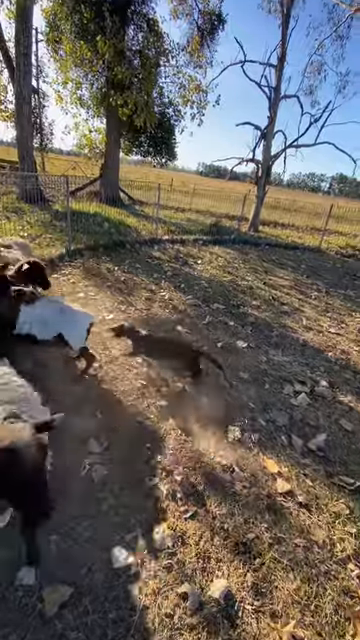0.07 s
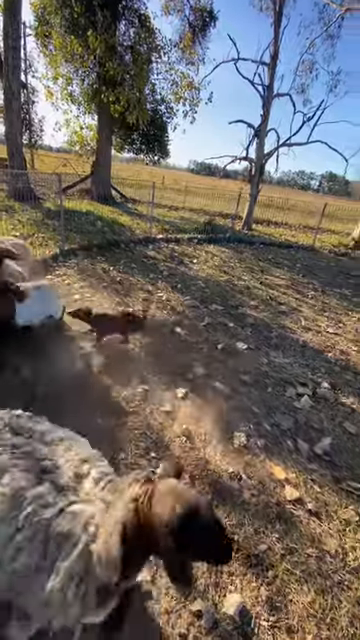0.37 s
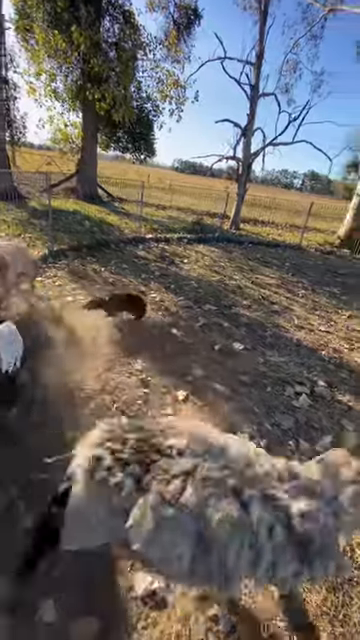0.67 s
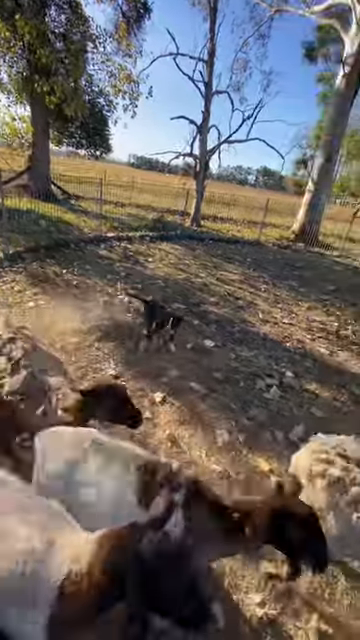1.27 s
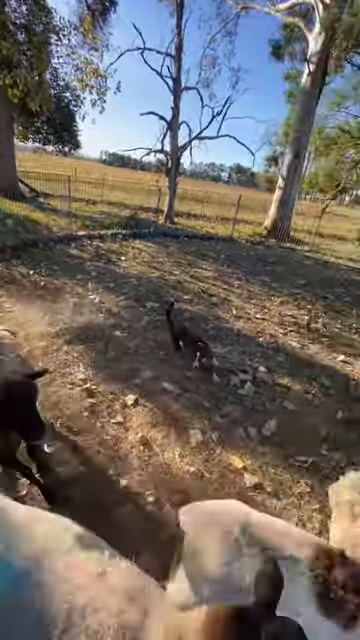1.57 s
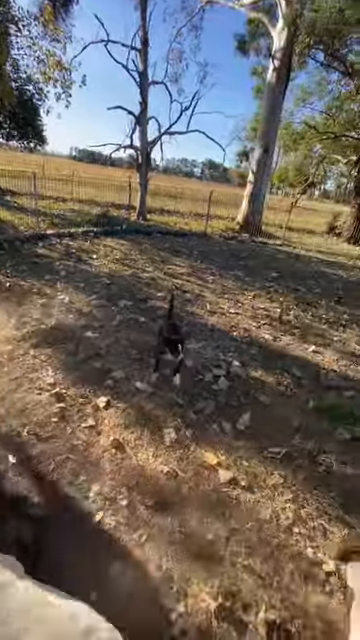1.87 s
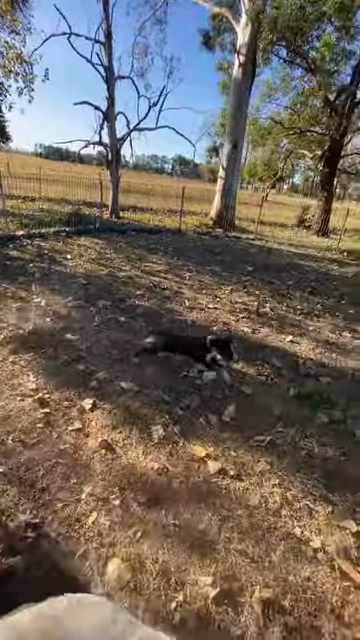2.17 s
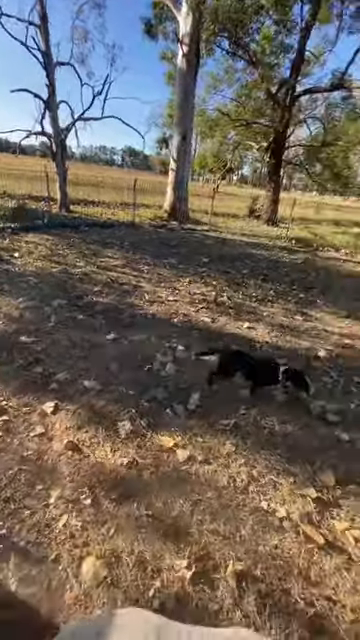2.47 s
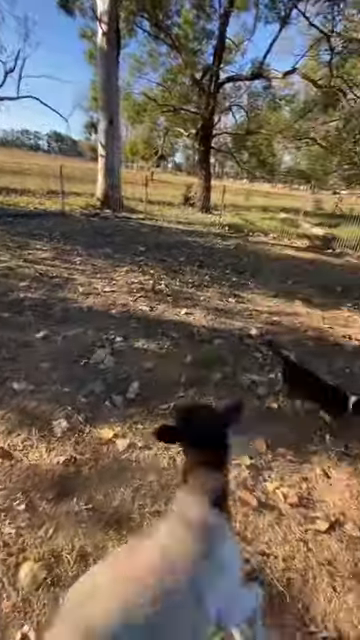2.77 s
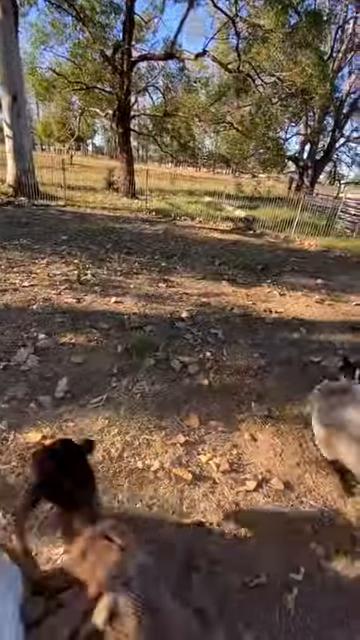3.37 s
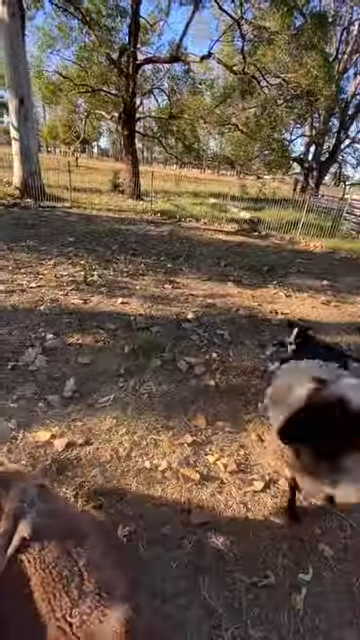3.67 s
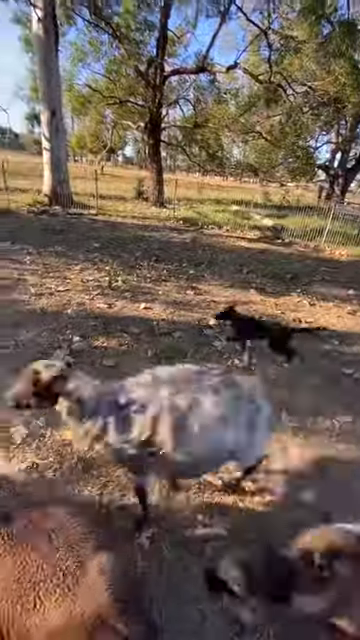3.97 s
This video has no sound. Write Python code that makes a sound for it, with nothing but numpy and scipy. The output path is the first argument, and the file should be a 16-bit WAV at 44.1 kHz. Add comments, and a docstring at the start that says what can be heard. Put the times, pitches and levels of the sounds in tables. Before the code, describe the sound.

Running sheep thud and scuff through dry leaf litter, snapping twigs and kicking stones.

```python
"""Feet scuff through dead leaves and a twig snaps: sheep run close past, chased by a dog, over dry
stony ground. Hooves thud on the hard earth, crunch grit, splinter twigs and kick stones that ring
briefly. Behind them the rest of the flock patters and rustles, and the ground trembles under it.
Heard in stereo in the open air, with the microphone a short way from the animals."""
import sys
import numpy as np
from scipy import signal
from scipy.fft import rfft, irfft, next_fast_len
from scipy.io import wavfile

SR = 44100
rng = np.random.default_rng(int(sys.argv[2]) if len(sys.argv) > 2 else 0)


def persist_wave(psi):
    """Save psi, clipped to +-1, as 16-bit WAV."""
    counts = np.round(np.clip(psi, -1, 1) * 32767).astype(np.int16)
    wavfile.write(sys.argv[1], SR, np.atleast_2d(counts).T)


N = 176400
TIME = np.arange(N) / SR
HIT_TIME, SCUFF_TIME = TIME[:SR // 6], TIME[:SR // 4]

# Feet dragging through the litter close by. Each row: start in seconds, length in seconds,
# crunch of grit in dB, hiss of leaves in dB, pitch of the rasp in Hz, level of the rasp in dB.
SCUFFS = [(0, 0.046, -40.5, -44, 4840, -48), (0.113, 0.13, -49, -47.5, 970, -58),
          (0.247, 0.042, -40, -39.5, 1090, -44.5), (0.294, 0.03, -37.5, -34.5, 3260, -42),
          (0.41, 0.045, -34, -32.5, 1120, -53), (0.456, 0.074, -32, -36.5, 1860, -61),
          (0.528, 0.15, -43.5, -42.5, 4220, -58), (0.631, 0.087, -41, -41.5, 3350, -45.5),
          (0.787, 0.055, -36.5, -37, 1036, -44), (0.862, 0.078, -36.5, -37, 1370, -46),
          (0.942, 0.078, -38, -38, 960, -55), (1.056, 0.051, -43.5, -48, 1070, -48),
          (1.122, 0.033, -57, -55, 1190, -54), (1.242, 0.07, -42.5, -40.5, 2810, -50),
          (1.345, 0.049, -40, -37.5, 1430, -51), (1.386, 0.049, -43.5, -41, 1970, -63),
          (1.47, 0.063, -41.5, -45, 1330, -58), (1.622, 0.097, -40.5, -40.5, 6180, -43),
          (1.707, 0.063, -45, -42.5, 5870, -55), (1.81, 0.063, -54, -42, 2000, -55),
          (1.857, 0.098, -40.5, -41.5, 2170, -44.5), (1.974, 0.08, -39.5, -42, 2000, -47.5),
          (2.118, 0.031, -48, -50, 995, -56.5), (2.206, 0.052, -41, -39, 4460, -49),
          (2.277, 0.054, -39, -46.5, 1030, -55), (2.442, 0.029, -39.5, -38, 3700, -49),
          (2.532, 0.11, -45.5, -46.5, 2690, -48.5), (2.574, 0.053, -42, -42, 1610, -69),
          (2.658, 0.044, -39.5, -40.5, 2000, -49), (2.703, 0.096, -39, -40, 1370, -52),
          (2.866, 0.059, -43.5, -49, 1350, -54.5), (2.925, 0.038, -33.5, -35, 1600, -57),
          (3.059, 0.13, -40.5, -42, 4940, -52), (3.267, 0.043, -50, -46, 1980, -67),
          (3.323, 0.049, -40, -44, 3070, -47), (3.424, 0.12, -44.5, -38, 2000, -54.5),
          (3.561, 0.062, -57, -43, 986, -47.5), (3.645, 0.017, -35.5, -32.5, 2350, -43),
          (3.735, 0.045, -37.5, -36, 2430, -40.5), (3.775, 0.046, -32, -29, 1670, -62),
          (3.83, 0.076, -41.5, -40.5, 955, -53), (3.96, 0.05, -31.5, -29, 1550, -43)]
# The stereo image's lean to one side. Each row: frequency in Hz, left over right in dB.
STEREO_BALANCE = [(60, 0.5), (200, 0.5), (400, 2.5), (700, 3.5), (1200, 7), (2400, 2), (4400, 1.3),
                  (8000, -0.5), (15000, 0.5)]


def from_db(db):
    """Decibels to gain."""
    return 10 ** (np.asarray(db) / 20)


def unit_rms(x):
    """Scale to an rms of 1."""
    return x / np.sqrt(np.mean(x ** 2) + 1e-20)


def at_hz(points, hz):
    """Read a spectrum on a log-frequency axis."""
    freqs, values = np.transpose(points)
    return np.interp(np.log(np.maximum(hz, 1)), np.log(freqs), values)


def fade(t, t60):
    """Hold at 1 until t = 0, then fall 60 dB every t60 seconds."""
    return 1000.0 ** (-np.maximum(t, 0) / t60)


def band(x, low_hz, high_hz, order=2):
    """Butterworth band-pass."""
    top = min(high_hz, .47 * SR)
    sos = signal.butter(order, [min(low_hz, top / 1.05), top], "band", fs=SR, output="sos")
    return signal.sosfilt(sos, x + 1e-18)


def drift(rate_hz):
    """A smooth random wander with a spread of 1."""
    hop, settle = 40, 2000
    pole = np.exp(-2 * np.pi * hop * rate_hz / SR)
    noise = rng.standard_normal(N // hop + settle + 2)
    slow = signal.lfilter([1], [1, -2 * pole, pole * pole], noise)[settle:]
    return np.interp(np.arange(N) / hop, np.arange(len(slow)), unit_rms(slow))


def stereo_noise(size):
    """White noise, half its power shared by both sides, half scattered."""
    return (rng.standard_normal(size) + rng.standard_normal((2, size))) / np.sqrt(2)


def add(out, start, sound):
    """Mix a sound in at start seconds."""
    i = int(np.clip(start * SR, 0, N - 1))
    out[:, i:i + sound.shape[-1]] += sound[..., :N - i]


def scuff_shape(length, attack_s=0.015):
    """A scuff swells, holds while the foot drags and dies away."""
    return np.clip(SCUFF_TIME / attack_s, 0, 1) * fade(SCUFF_TIME - length, t60=0.1)


def scuff_levels(rustle_db):
    """How hard grit and leaves are stirred: near scuffs add their power to the flock's rustle."""
    power = np.ones((2, 1)) * from_db(rustle_db) ** 2
    for start, length, grit_db, leaf_db, _, _ in SCUFFS:
        add(power, start, (from_db([[grit_db], [leaf_db]]) * scuff_shape(length)) ** 2)
    return np.sqrt(power)


def crackle(colour, grains_per_s=1700, spread_db=2.5, flicker_db=3):
    """Dense tiny fractures of uneven size over a smooth hiss, flickering separately in 26 bands."""
    fractures = rng.random(N) < grains_per_s / SR
    sizes = unit_rms(fractures * from_db(spread_db * np.minimum(rng.exponential(1, N), 5)))
    grains = np.hypot(sizes, from_db(-3))   # the floor is the hiss
    edges = np.geomspace(300, 17000, 26 + 1)
    out = np.zeros((2, N))
    for low, high in zip(edges, edges[1:]):
        gain = from_db(at_hz(colour, np.sqrt(low * high)) + flicker_db * drift(rate_hz=28.3))
        out += gain * band(grains * stereo_noise(N), low, high)
    return unit_rms(out)


def litter(grit, leaves):
    """Grit crunches and dead leaves hiss as hard as the feet stir them."""
    # Colours of crushed grit and of dry leaves. Each row: frequency in Hz, relative density in dB.
    grit_colour = [(300, -15), (500, 2.5), (800, 2), (1300, -1), (2300, 4.5), (3300, -0.5), (4800, -6),
                   (8000, -0.5), (16000, -44)]
    leaf_colour = [(300, -9), (2000, -22), (3500, 0), (5000, 8.5), (6300, -1.5), (7600, -18.5), (10000, -2),
                   (12300, -2.5), (13000, -41), (16000, -39)]
    return from_db(0.5) * grit * crackle(grit_colour) + from_db(-1) * leaves * crackle(leaf_colour)


def rasps(relative_width=0.15):
    """A narrow band of crackle gives each scuff its own colour."""
    out = np.zeros((2, N))
    edge = 1 + relative_width / 2
    for start, length, _, _, hz, db in SCUFFS:
        spiky_noise = stereo_noise(len(SCUFF_TIME)) * rng.exponential(1, len(SCUFF_TIME)) ** 2
        rasp = unit_rms(band(spiky_noise, hz / edge, hz * edge))
        add(out, start, from_db(db + 2.5) * rasp * scuff_shape(length))
    return out


def rumble(flock_db):
    """The ground trembles under many feet, swelling with the flock."""
    # Colour of the trembling ground. Each row: frequency in Hz, relative density in dB.
    ground_colour = [(20, -40), (32, -18), (45, 9), (70, -6.5), (100, -8.5), (200, -4.5), (400, -8),
                     (800, -27.5)]
    gain = from_db(at_hz(ground_colour, np.fft.rfftfreq(N, 1 / SR)))
    return from_db(flock_db - 49) * unit_rms(irfft(rfft(stereo_noise(N)) * gain, N))


def snap(db, hz, crack_db, rise_s=0.0016, relative_width=0.36):
    """A twig splinters fibre by fibre: a burst around one pitch, a bright crack, a spray of debris."""
    noise = stereo_noise(len(HIT_TIME))
    edge = 1 + relative_width / 2
    body = unit_rms(band(noise, hz / edge, hz * edge, order=1))
    crack = unit_rms(band(noise, 5430, 12300)) * fade(HIT_TIME, t60=0.0054)
    burst = fade(HIT_TIME - rise_s, t60=0.017)
    debris = from_db(-18.5) * fade(HIT_TIME, t60=0.23)
    rise = np.clip(HIT_TIME / rise_s, 0, 1)
    return from_db(db - 9) * rise * (burst + debris) * body + from_db(db + crack_db - 7) * crack


def twigs(leaves, small_per_s=44):
    """Loud snaps close by, and small ones as strong as the stirring of the leaves."""
    # Dry twigs and leaves breaking. Each row: start in seconds, level in dB, pitch in Hz,
    # bright crack in dB relative to that level.
    near_snaps = [(.008, -24, 5300, 6), (0.039, -28, 5500, 5), (0.166, -35, 3520, -12),
                  (0.2993, -14.5, 5540, -9), (.314, -17.5, 3360, 0), (.373, -39, 7000, 5),
                  (0.414, -19.5, 2100, -2), (0.432, -25, 5000, 2), (0.442, -22, 4500, -6),
                  (0.593, -33, 3000, 12), (0.7957, -19.5, 3600, -3), (.8, -23.5, 5030, -5),
                  (.886, -28, 2220, 7), (.912, -20.5, 3860, -19), (.919, -23, 5600, -17),
                  (.99, -22, 5430, -5), (1.109, -38, 6000, 16), (1.334, -25, 5000, -8),
                  (1.367, -19.5, 5000, -5), (1.51, -32, 5200, 12.5), (1.639, -34, 5700, -17),
                  (1.8786, -20, 4800, -29), (1.982, -29, 2290, -6), (2.175, -29.5, 5960, -15),
                  (2.205, -28.5, 5490, -8), (2.224, -28, 5240, -12), (2.29, -16, 2200, -27),
                  (2.4, -35, 9600, 4), (2.4593, -25.5, 5700, 7), (2.673, -20, 5230, -6),
                  (2.689, -18.5, 5200, -3), (2.866, -42, 8000, 7), (2.918, -24, 5570, 5),
                  (2.944, -25, 5600, -3), (2.95, -22, 5600, -14), (3.253, -27, 3420, 4.5),
                  (3.34, -25, 6200, 10), (3.49, -23, 6000, 11), (3.5115, -22, 6300, -10),
                  (3.6579, -17, 2470, -17), (3.66, -17, 4700, -8), (3.809, -17.5, 3020, -5),
                  (3.819, -18, 4000, -11), (3.882, -22, 6420, -12), (3.932, -27, 7000, -3),
                  (3.971, -12, 6350, 5.5)]
    out = np.zeros((2, N))
    for start, db, hz, crack_db in near_snaps:
        add(out, start, snap(db, hz, crack_db))
    for start in rng.uniform(0, N / SR, int(small_per_s * N / SR)):
        hz = 4500 * 2 ** rng.uniform(-1.83, 1)
        add(out, start, np.interp(start, TIME, leaves) * snap(rng.normal(1, 2.8), hz, crack_db=-18))
    return out


def thump(hz, peak_cycles, sharpness=2.18):
    """A swing of the ground that builds up and dies within a few cycles."""
    cycles = hz * HIT_TIME
    age = cycles / peak_cycles
    return np.sin(2 * np.pi * cycles) * (age * np.exp(1 - age)) ** sharpness


def hoof(knock_db, hz, peak_cycles, earth_db, earth_hz=500):
    """One hoof fall: a hollow knock, and earth crumbling under it."""
    earth = unit_rms(band(stereo_noise(len(HIT_TIME)), earth_hz / 2.04, earth_hz * 1.4))
    crumble = from_db(earth_db + 4) * earth * fade(HIT_TIME, t60=0.06)
    return from_db(knock_db - 0.5) * thump(hz, peak_cycles) + crumble


def landing(db, hz):
    """The weight of an animal sinks into the ground with a deep thud."""
    return from_db(db + 2) * thump(hz, peak_cycles=0.95)


def hooves(flock_db, steps_per_s=45):
    """Hooves strike hard earth near the microphone, over the random patter of the flock behind."""
    # Near hoof falls. Each row: start in seconds, knock in dB, its pitch in Hz,
    # cycles until it peaks, crumbling earth in dB.
    near_falls = [(0.115, -38, 260, 2, -46), (0.173, -36, 172, 0.7, -48), (0.245, -37.5, 258, 1.7, -54),
                  (0.286, -29, 175, 0.61, -50), (0.316, -36, 143, 1, -51), (0.336, -32, 135, 0.84, -49),
                  (0.376, -33, 213, 0.91, -45.5), (0.441, -48, 286, 0.8, -47),
                  (0.521, -31.5, 301, 0.63, -38), (0.558, -46, 232, 0.67, -58),
                  (0.659, -26, 149, 0.59, -61), (0.682, -22, 205, 1.7, -31),
                  (0.773, -31.5, 248, 1.9, -38.5), (0.811, -23, 137, 0.56, -51),
                  (0.859, -32, 177, 0.97, -45), (0.88, -33.5, 151, 0.99, -58),
                  (0.926, -35.0, 248, 2.3, -56), (0.988, -31, 224, 1, -40), (1.026, -25.0, 167, 1.4, -53),
                  (1.087, -33, 180, 0.98, -42), (1.121, -44, 207, 1, -50), (1.155, -34, 222, 1.8, -39.5),
                  (1.232, -32, 198, 1.7, -49), (1.254, -31, 194, 1.04, -43), (1.293, -27.5, 142, 0.75, -47),
                  (1.395, -25, 470, 1.13, -44), (1.421, -31, 180, 1.24, -43), (1.488, -28.5, 223, 1.1, -44),
                  (1.505, -31.5, 146, 1.2, -41), (1.583, -31.5, 227, 0.8, -41.5), (1.641, -37, 265, 2, -44),
                  (1.664, -37, 197, 0.98, -45), (1.746, -34, 145, 1.2, -45), (1.86, -34.5, 168, 0.94, -53),
                  (1.946, -34, 135, 0.74, -44), (1.973, -30.5, 146, 0.67, -41),
                  (2.048, -37.0, 245, 1.2, -49), (2.218, -31.5, 210, 0.79, -44),
                  (2.357, -36.5, 179, 1.16, -57), (2.469, -35, 138, 1.15, -43), (2.671, -37, 286, 0.9, -53),
                  (2.768, -45, 306, 0.66, -42.5), (2.892, -31.0, 261, 0.38, -37),
                  (2.919, -32, 460, 1.4, -47), (2.962, -26, 211, 0.71, -47), (3.037, -36, 237, 0.8, -45.5),
                  (3.134, -29.5, 326, 0.71, -36.5), (3.186, -35, 159, 0.73, -40),
                  (3.266, -29.5, 443, 0.84, -43), (3.494, -25.5, 218, 0.64, -55),
                  (3.543, -26, 287, 0.59, -41.5), (3.613, -22.5, 328, 0.76, -32.5),
                  (3.665, -34, 298, 0.62, -46), (3.74, -27.5, 241, 1.12, -36.5),
                  (3.809, -32.5, 267, 0.71, -37.5), (3.919, -24.5, 282, 0.63, -37.5),
                  (3.935, -36, 200, 0.8, -43)]
    # Heavy landings. Each row: start in seconds, level in dB, pitch in Hz.
    heavy_landings = [(0.327, -31, 88), (0.368, -44, 79), (0.552, -36.5, 78), (0.8, -23.5, 76.5),
                      (1.143, -39.5, 75), (1.284, -32, 74.6), (1.669, -33.5, 70.4), (2.912, -36, 61),
                      (3.027, -36.0, 67), (3.19, -36, 84), (3.283, -38.5, 72), (3.633, -28.5, 80.6),
                      (3.702, -33.0, 68.3), (3.769, -36, 66), (3.842, -26, 67.4), (3.923, -28, 77.5),
                      (3.975, -34, 71.6)]
    out = np.zeros((2, N))
    for start, *fall in near_falls:
        add(out, start, hoof(*fall))
    for start, db, hz in heavy_landings:
        add(out, start, landing(db, hz))
    for step in range(int(steps_per_s * N / SR)):
        start = (step + rng.uniform(-1, 1)) / steps_per_s
        db = np.interp(start, TIME, flock_db) + rng.normal(-41.5, 2.5)
        polarity = rng.choice([-1, 1])
        knock_hz = 218.7 * 2 ** rng.uniform(-1.03, 1)
        add(out, start, polarity * hoof(db, knock_hz, peak_cycles=0.96, earth_db=db - 15))
        add(out, start, landing(db - 5.5, hz=68.3 * np.exp(rng.normal(0, 0.17))))
    return out


def clack(db, hz, pan_db, rise_s=0.00044):
    """A struck stone rings briefly in a few uneven modes."""
    # Modes of a stone. Each row: ratio to its pitch, level in dB, seconds to fall 60 dB.
    modes = [(0.999, -1.5, 0.026), (1.129, -10.5, 0.038), (1.36, -2, 0.021), (1.62, -5.5, 0.016),
             (2.3, -4.5, 0.012)]
    t = TIME[:SR // 20]
    ring = 0
    for ratio, mode_db, t60 in modes:
        gain = from_db(rng.normal(mode_db, 2)) * rng.choice([-1, 1])
        mode_hz = hz * ratio * rng.normal(1, 0.012)
        ring += gain * fade(t, t60) * np.sin(2 * np.pi * mode_hz * t)
    return from_db(db + np.array([[pan_db], [-pan_db]]) / 2) * ring * np.clip(t / rise_s, 0, 1)


def stones(grit, bounce_s=0.0048, pebbles_per_s=110):
    """Kicked stones clack and bounce once; rolling pebbles click as hard as the grit is stirred."""
    # Stones kicked close by. Each row: start in seconds, level in dB, pitch in Hz, left over right in dB.
    kicks = [(0.203, -28.5, 1790, 9), (0.267, -16.5, 1244, 10), (.487, -26, 2120, 12),
             (.502, -18.5, 2286, 9), (.646, -25.5, 1347, 18), (.6885, -14.5, 2960, 3),
             (1.095, -32, 1044, 16), (1.822, -28, 2000, 7.5), (1.877, -28.5, 1846, 20),
             (1.908, -31, 2330, 18), (1.993, -48, 2000, -4), (2.03, -22.5, 1880, 18.5),
             (2.126, -44, 1840, 1), (2.29, -26, 1475, 1), (2.528, -25.5, 2390, 4), (2.762, -18, 1515, 3),
             (2.771, -22.5, 1860, 6), (2.953, -23, 1592, 8), (3.287, -34, 2370, -4), (3.81, -28, 1600, -10)]
    out = np.zeros((2, N))
    for start, db, hz, heard_pan_db in kicks:
        pan_db = heard_pan_db - at_hz(STEREO_BALANCE, hz)   # the stereo spread adds its own lean
        add(out, start, clack(db - 4, hz, pan_db))
        add(out, start + bounce_s * rng.uniform(0.378, 1.8), clack(db - 11, hz, pan_db))
    for start in rng.uniform(0, N / SR, int(pebbles_per_s * N / SR)):
        hz = 2236 * 2 ** rng.uniform(-1.168, 1.1)
        pebble = clack(rng.normal(-2.5, 2.8), hz, pan_db=rng.normal(0, 5))
        add(out, start, np.interp(start, TIME, grit) * pebble)
    return out


def scene():
    """Near animals run through the litter while the flock behind swells, eases and swells again."""
    # Unbroken rustle of the whole flock. Each row: time in seconds, level in dB.
    flock_rustle = [(0, -48), (.6, -44.5), (1.2, -44.5), (1.8, -46), (2.15, -49.5), (2.4, -50.5),
                    (2.7, -46.5), (3.25, -47), (3.7, -45), (4, -38.5)]
    rustle_db = np.interp(TIME, *np.transpose(flock_rustle))
    flock_db = rustle_db - rustle_db.mean()
    grit, leaves = scuff_levels(rustle_db)
    scuffing = litter(grit, leaves) + rasps()
    return scuffing + rumble(flock_db) + hooves(flock_db) + twigs(leaves) + stones(grit)


def record(dry, in_phase_below_hz=270, low_cut_hz=47, high_cut_hz=16000):
    """Stereo spread: the sides differ in phase and level above the bass. Deep bass and top are cut."""
    # Phase between left and right. Each row: frequency in Hz, lead of the left in radians.
    stereo_phase = [(0, -1.5), (780, 3), (2840, 4.5), (3900, 4.5), (5170, 1.73), (5500, 0.84), (7000, 2.5),
                    (7600, 3.5), (9730, 7), (11600, 8), (12800, 29), (16000, -6.5)]
    size = next_fast_len(N + SR // 10)
    hz = np.fft.rfftfreq(size, 1 / SR)
    phase = np.interp(hz, *np.transpose(stereo_phase)) * (1 - np.exp(-(hz / in_phase_below_hz) ** 2))
    side = np.array([[.5], [-.5]])
    response = from_db(side * at_hz(STEREO_BALANCE, hz)) * np.exp(1j * side * phase)
    heard = irfft(rfft(dry, size) * response, size)[:, :N]
    heard = signal.sosfilt(signal.butter(2, low_cut_hz, "high", fs=SR, output="sos"), heard)
    return signal.sosfilt(signal.ellip(10, .2, 80, high_cut_hz, fs=SR, output="sos"), heard)


dry = scene()
out = record(dry)
persist_wave(out)
```